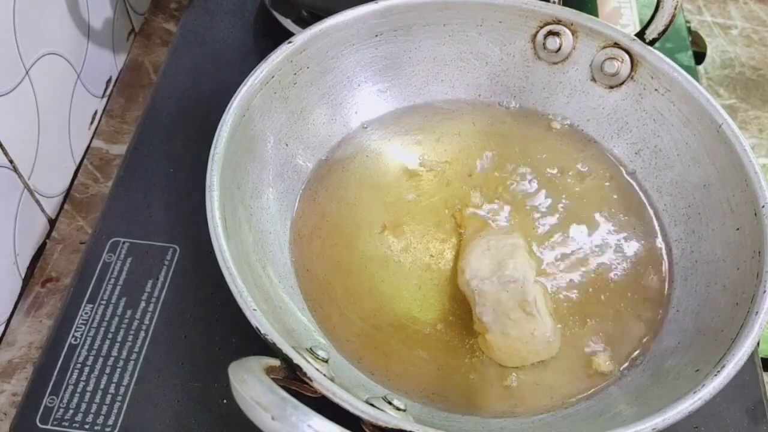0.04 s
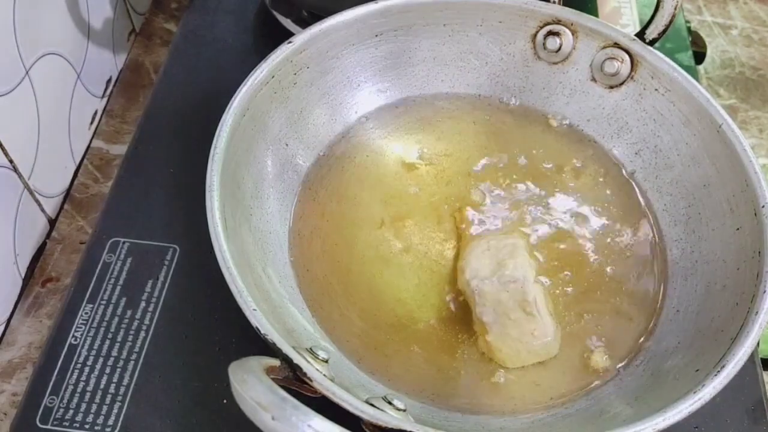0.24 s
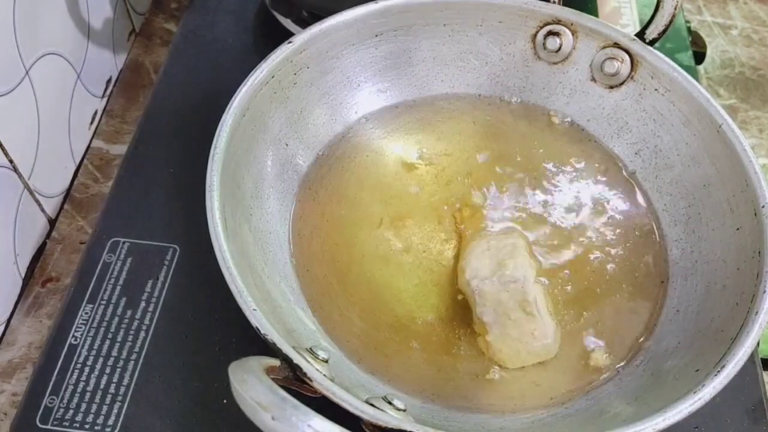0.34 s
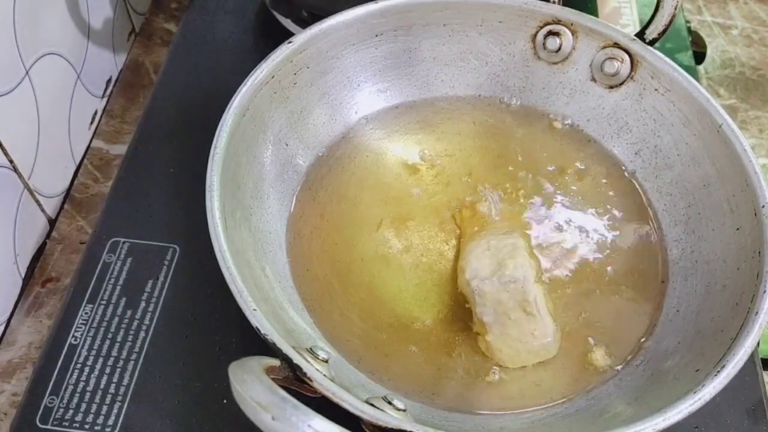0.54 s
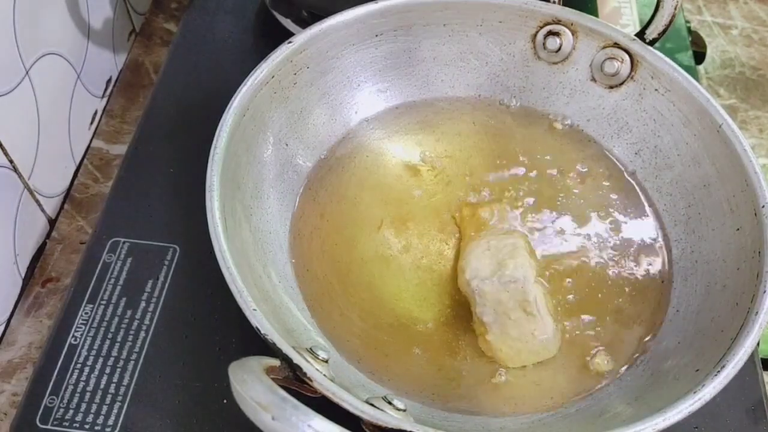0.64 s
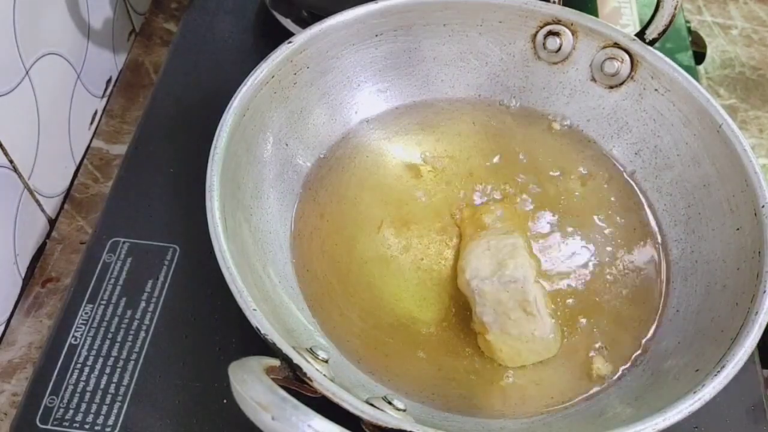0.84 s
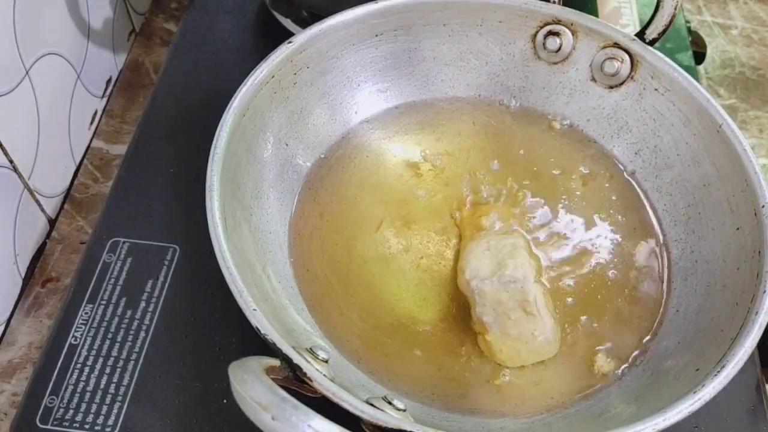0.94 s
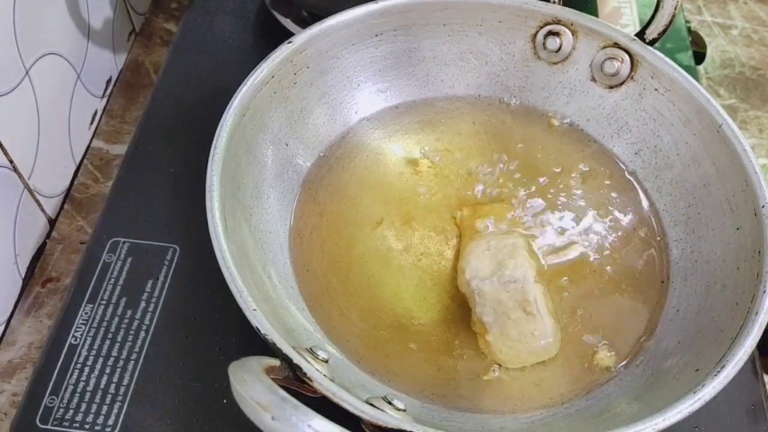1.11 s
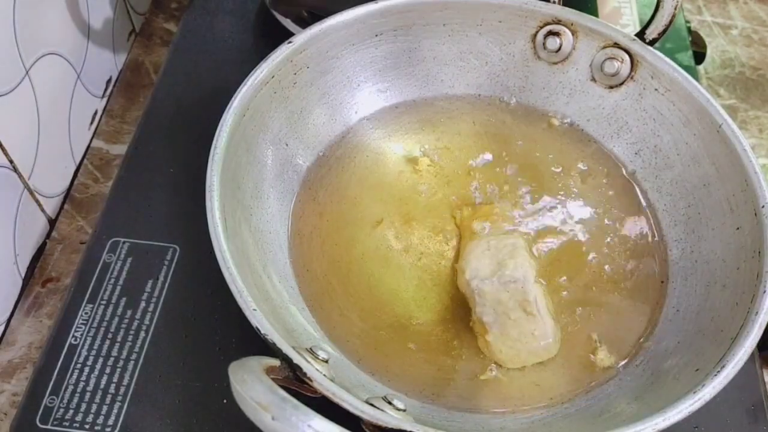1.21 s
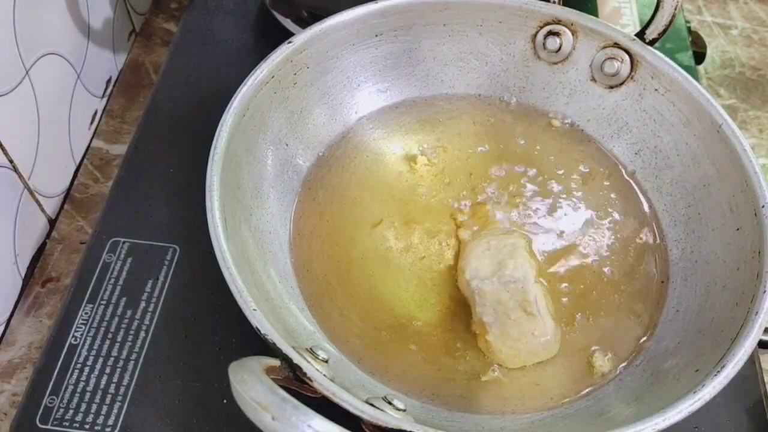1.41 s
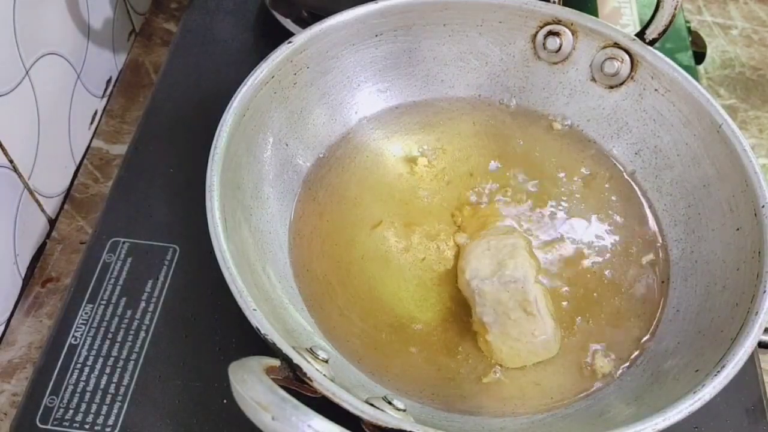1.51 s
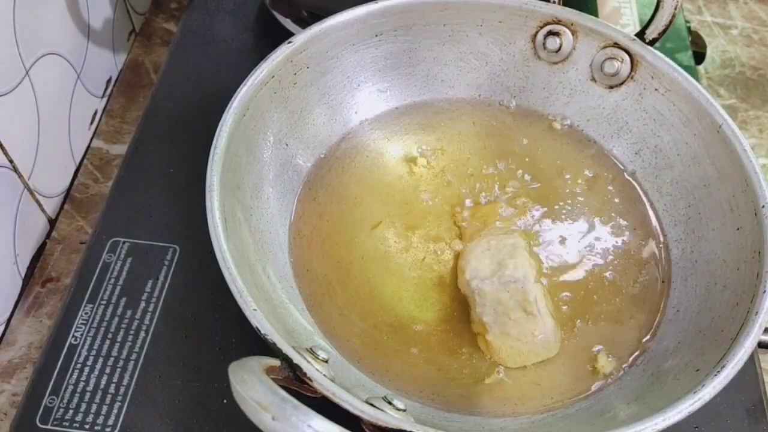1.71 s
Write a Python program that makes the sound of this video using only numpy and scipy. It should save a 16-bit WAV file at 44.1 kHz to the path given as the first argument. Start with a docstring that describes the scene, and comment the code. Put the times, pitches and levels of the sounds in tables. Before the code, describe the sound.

Oil sizzles and snaps around frying batter in a metal pan, with a knock on the counter

```python
"""In a small hard-walled kitchen, a piece of batter fries slowly in a deep metal pan.
Steam pockets pop one by one: clicks ring the pan, a bubble and the spray. Many tiny ringing grains make
the sizzle, and shaped noise makes the low hum. Short tone bursts knock on the counter and the room booms.
A fluttering pair of tones is a thin squealing jet of steam; swells of hollow noise are soft thuds."""
import sys
import numpy as np
from scipy import signal
from scipy.io import wavfile

SR = 44100
rng = np.random.default_rng(int(sys.argv[2]) if len(sys.argv) > 2 else 0)


def rack_gain(trim_db):
    """Turn a fader trim in dB into the linear factor to multiply a signal by."""
    fader = np.asarray(trim_db, float)
    return 10 ** (fader / 20)


def wav_record(signal):
    """Record a signal, one row per channel, as 16-bit PCM in the file named by sys.argv[1]."""
    frames = np.transpose(np.atleast_2d(signal))
    bounded = np.clip(frames, -1, 1)
    # unit amplitude maps onto the largest positive 16-bit level
    quanta = np.round(bounded * 32767).astype(np.int16)
    wavfile.write(sys.argv[1], SR, quanta)


N = 77175
LEAD = SR // 10  # samples made ahead of time 0, cut off in scene()
TIME = (np.arange(N + LEAD) - LEAD) / SR


def rms_one(x):
    """Scale a sound to an rms (average strength) of 1."""
    return x / np.sqrt(np.mean(x ** 2) + 1e-20)


def at_hz(points, hz):
    """Read a table between its points, on a log-frequency axis."""
    table_hz, values = np.transpose(points)
    return np.interp(np.log(hz), np.log(table_hz), values)


def drift(rate_hz, size):
    """Random wandering around 0 with rms 1: noise smoothed twice, so fast changes die out."""
    r = np.exp(-2 * np.pi * rate_hz / SR)
    noise = rng.standard_normal(size + SR)
    smooth = signal.lfilter([1], [1, -2 * r, r * r], noise)
    return rms_one(smooth[SR:])  # skip the first second, while the filter settles


def ring(clicks, hz, t60):
    """Each unit click starts a sine of height 1 that falls 60 dB in t60 seconds."""
    r, w = rack_gain(-60 / (t60 * SR)), 2 * np.pi * hz / SR
    return signal.lfilter([0, np.sin(w)], [1, -2 * r * np.cos(w), r * r], clicks + 1e-18)


def resonate(x, hz, width_hz):
    """Pass a sound twice through one resonance; white noise roughly keeps its rms."""
    r = np.exp(-np.pi * width_hz / SR)
    b = np.array([1, 0, -1]) * (1 - r * r) / 2
    a = [1, -2 * r * np.cos(2 * np.pi * hz / SR), r * r]
    once = signal.lfilter(b, a, x + 1e-18)
    return signal.lfilter(b, a, once) * np.sqrt(SR / (2 * width_hz))


def left_right(db):
    """Gains that make the left side db louder than the right."""
    return rack_gain(db / 2 * np.array([[1], [-1]]))


# How alike left and right are: (frequency [Hz], likeness [0 to 1])
LIKENESS = [(30, 0.91), (120, .98), (300, 0.54), (2000, 0.27), (12000, 0.033)]


def bands(size, shape):
    """Stereo noise in half-octave bands, each multiplied by shape(Hz); shared noise makes sides alike."""
    out, edges = 0, 22 * 2 ** np.arange(0, 9.6, .5)
    white = rng.standard_normal((2, 2, size))  # neighbouring bands take turns with two noises
    for k, (low, high) in enumerate(zip(edges, edges[1:])):
        band = signal.butter(2, [low, high], "band", fs=SR, output="sos")
        mid, side = signal.sosfilt(band, white[k % 2])
        hz = np.sqrt(low * high)
        alike = np.clip(at_hz(LIKENESS, hz), 0, 1)
        stereo = np.sqrt(1 + alike) * mid + np.sqrt(1 - alike) * side * [[1], [-1]]
        out = out + shape(hz) * stereo
    return out


# Resonances that colour the spray: (frequency [Hz], width of each pass [Hz], level [dB])
SPLASH = [(4200, 730, -6.5), (5420, 1400, -3), (7220, 1070, 3.5), (11880, 4800, -5.5)]


def splash(x):
    """Bursting spray: a few broad resonances side by side."""
    return sum(rack_gain(level_db) * resonate(x, hz, width) for hz, width, level_db in SPLASH)


PAN_HZ, PAN_WIDTH_HZ = 2590, 700
BUBBLE_Q = 3.2  # bubble pitch over resonance width
RATTLE_S, RATTLE_FEEDBACK = (.00025, .0006, .001), .45  # longest delays, shortened at random for each pop
POP_DB = 15  # added to all three levels in the table
# Steam pops: (time [s], pan ring level [dB], bubble level [dB], bubble pitch [Hz], splash level [dB])
POPS = [(-.03, -30, -23, 5100, -29.5), (0.1202, -38.5, -40, 3900, -53), (0.1289, -37.5, -39, 6600, -59),
        (0.2035, -37.5, -50, 4350, -66), (0.22, -42, -43, 6500, -65), (0.3019, -18.5, -30.5, 4700, -36),
        (0.3434, -59, -69, 7300, -41), (0.3944, -65, -28.5, 6720, -36.5), (0.6918, -99, -36.5, 6420, -43),
        (0.7801, -31, -27, 4500, -38.5), (.8255, -79, -51, 3760, -55), (0.9621, -52, -53.5, 7500, -46),
        (1.124, -41.5, -29, 4880, -39), (1.156, -45, -44, 4630, -54.5), (1.3136, -65, -33, 6720, -35.5),
        (1.5225, -60, -36, 9560, -41), (1.6753, -28.5, -27.5, 4020, -32.5)]


def pops():
    """A click drives the pan, a bubble and the spray; all-pass delays smear it as bounces inside the pan."""
    out = np.zeros((2, N + 2 * LEAD))
    click = np.zeros(SR // 20)
    click[0] = 1
    for s, pan_db, bubble_db, hz, splash_db in POPS:
        pan = rack_gain(pan_db) * resonate(click, PAN_HZ, PAN_WIDTH_HZ)
        bubble = rack_gain(bubble_db) * resonate(click, hz, hz / BUBBLE_Q)
        sound = pan + bubble + rack_gain(splash_db) * splash(click)
        shared, own = rng.uniform(.7, 0.99, 3), rng.uniform(0.95, 1.03, (2, 3))
        start = LEAD + int(s * SR)
        for side in range(2):
            heard = sound
            lags = (np.array(RATTLE_S) * shared * own[side] * SR).astype(int)
            for lag in lags:
                a = np.r_[1, np.zeros(lag - 1), -RATTLE_FEEDBACK]
                heard = signal.lfilter(a[::-1], a, heard)
            out[side, start:start + len(click)] += rack_gain(POP_DB) * heard
    return out[:, :N + LEAD] * left_right(.6)


GRAIN_SPREAD_DB = 3


def grains(curve, per_s, pitches, sharpness):
    """Random tiny bubbles ring briefly, separately on each side; their level follows a curve."""
    size, (s, level_db) = (2, N + LEAD), np.transpose(curve)
    strength = rack_gain(GRAIN_SPREAD_DB * np.minimum(rng.exponential(1, size), 4)) * rng.choice([-1, 1], size)
    born = rng.random(size) < per_s / SR
    pitch_index = rng.integers(0, len(pitches), size)
    rings = 0
    for k, hz in enumerate(pitches):
        rings = rings + resonate(strength * born * (pitch_index == k), hz, hz / sharpness)
    return rack_gain(np.interp(TIME, s, level_db)) * rms_one(rings)


SIZZLE_PER_S, SIZZLE_DB = 6500, -1.5  # grains a second on each side; dB added to the table
SEETHE_PER_S, SEETHE_DB = 1000, 5
# Fine sizzle: (time [s], level [dB])
HISS = [(0.0, -49), (0.272, -60.5), (0.424, -66.5), (0.676, -51), (0.842, -48), (0.974, -64),
        (1.622, -72.5), (1.75, -44)]
# Low seething of the oil: (time [s], level [dB])
SEETHE = [(0.0, -63), (0.228, -61.5), (0.374, -58.5), (0.516, -66), (0.716, -60), (0.804, -56.5),
          (0.96, -65.5), (1.188, -96.5), (1.374, -68.5), (1.51, -74), (1.75, -104)]


def sizzle():
    """Many high bubbles make the fine sizzle; fewer, lower ones make the seething of the oil."""
    fine = grains(HISS, SIZZLE_PER_S, np.geomspace(2200, 8200, num=12), sharpness=5.2)
    low = grains(SEETHE, SEETHE_PER_S, np.geomspace(620, 1900, num=10), sharpness=5.3)
    return rack_gain(SIZZLE_DB) * fine + rack_gain(SEETHE_DB) * low


FLOOR_DB = -59.5  # overall rms of hum and hiss
# Colour of hum and hiss, before scaling: (frequency [Hz], relative level per Hz [dB])
FLOOR = [(20, 7), (40, -21), (93, 1), (200, -20.5), (300, -19.5), (900, -23), (2560, -24.5), (7480, -31),
         (10000, -40), (15000, -25)]


def hum():
    """Hum and hiss of the kitchen: shaped noise whose bands each waver gently in level."""
    noise = bands(N + LEAD, lambda hz: rack_gain(at_hz(FLOOR, hz) + 2.0 * drift(1.33, N + LEAD)))
    return rack_gain(FLOOR_DB) * rms_one(noise)


TAIL_RISE_S, EARLY_T60_S = 0.001, 0.035
# Near surfaces: (delay [s], level [dB])
ECHOES = [(.0052, -12), (.0075, -12), (.0135, -14)]
# Dense early cluster, starting level: (frequency [Hz], level [dB])
EARLY = [(300, -28), (1000, -43.5), (2500, -19.5), (7000, -33)]
# Long tail, starting level: (frequency [Hz], level [dB])
TAIL = [(200, -38), (500, -28), (900, -44.5), (1500, -46), (2500, -33.5), (5000, -31.5), (8000, -33.5),
        (12000, -39)]
# Time the tail takes to fall 60 dB: (frequency [Hz], time [s])
ROOM_T60 = [(200, 0.3), (500, 0.53), (900, 0.57), (1500, 0.6), (2500, 0.52), (6000, 0.23), (12000, 0.72)]


def room(x):
    """Hard walls add near echoes, a dense early cluster and a diffuse tail that dies band by band."""
    t = np.arange(SR) / SR

    def fading(hz):
        tail = rack_gain(at_hz(TAIL, hz) - 60 * t / at_hz(ROOM_T60, hz))
        return tail + rack_gain(at_hz(EARLY, hz) - 60 * t / EARLY_T60_S)

    response = (1 - np.exp(-t / TAIL_RISE_S)) * bands(SR, fading)
    for lag, level_db in ECHOES:
        lags = (lag * rng.uniform(.94, 1.06, 2) * SR).astype(int)  # a little different on each side
        response[[0, 1], lags] += rack_gain(level_db)
    return x + signal.fftconvolve(x, response, axes=1)[:, :x.shape[1]]


KNOCK_CRACK_DB = -27  # crack relative to the tone burst
# Knocks on the counter: (time [s], level [dB], pitch [Hz], contact [s], push on the boom [dB])
KNOCKS = [(.2397, -6.5, 923, 0.00045, -27.5), (0.4176, -25, 697, 0.00069, -32.5)]


def knocks():
    """Each knock is a bell-shaped tone burst, longer for a longer contact, with a faint crack."""
    direct = np.zeros(N + LEAD)
    for s, level_db, hz, contact, _ in KNOCKS:
        u = TIME - s - contact
        burst = np.exp(-.5 * (u / contact) ** 2) * np.cos(2 * np.pi * hz * u + 1)
        direct += rack_gain(level_db) * burst
        direct[LEAD + int(s * SR)] += rack_gain(level_db + KNOCK_CRACK_DB)
    direct = signal.sosfilt(signal.butter(2, 150, "high", fs=SR, output="sos"), direct)
    return direct * left_right(2.5)


BOOM_RISE_HZ, BOOM_WAVER_HZ, BOOM_WAVER_DB = 27.8, 22, 2.5
COUNTER_T60_S, COUNTER_LAG_S = .42, 0.00085
THUD_BOOM_DB = -10  # push of a thud relative to its own level
# Room modes: (frequency [Hz], level [dB], time to fall 60 dB [s])
LOW_BOOM = [(72.8, -23, 0.92), (91.57, -7, 1.15), (113.1, -12.5, 1.28), (160.9, -5.5, 1.2), (221, -17, 1.8)]
# Counter modes: (frequency [Hz], level [dB])
COUNTER_DB = [(334, 1), (418, -10), (462, -10.5), (500, -4), (580, -23.5), (640, -8), (718, -8), (785, -8)]


def boom():
    """Knocks and thuds push the wavering modes of counter and room, which rise softly and ring on."""
    pushes = [(knock[0], knock[4]) for knock in KNOCKS]
    pushes += [(thud[0], thud[1] + THUD_BOOM_DB) for thud in THUDS]
    push = np.zeros(N + LEAD)
    for s, level_db in pushes:
        push[LEAD + int(s * SR)] = rack_gain(level_db)
    modes = LOW_BOOM + [(hz, level_db, COUNTER_T60_S) for hz, level_db in COUNTER_DB]
    out = 0
    for hz, level_db, t60 in modes:
        # taking away a quickly dying copy makes the start soft
        quick = ring(push, hz, np.log(1000) / (2 * np.pi * BOOM_RISE_HZ))
        rising = ring(push, hz, t60) - quick
        # above 300 Hz the right side is shifted in time
        lag = int(rng.uniform(-1.56, 1) * COUNTER_LAG_S * SR * (hz > 300))
        lean_db = rng.normal(0, 0.99) * np.log(hz / 80) * np.array([[1], [-1]])
        waver_db = BOOM_WAVER_DB * drift(BOOM_WAVER_HZ, len(push))
        out = out + rack_gain(level_db + lean_db + waver_db) * np.array([rising, np.roll(rising, lag)])
    return out


SQUEAL_HZ, SQUEAL_WANDER_HZ = 6930, 90  # middle pitch and rms wander
FLUTTER_HZ, FLUTTER_DB = 150, 6  # the rate serves both pitch and level
UPPER_RATIO, OCTAVE_DB = 1.965, -13.5  # upper whistle, near the octave
# Steam jet, before its flutter: (time [s], level [dB])
SQUEAL = [(0.8, -59), (0.812, -76), (0.82, -41), (0.832, -51), (0.856, -59), (0.878, -58), (0.882, -43.5),
          (0.932, -83), (0.95, -84), (0.962, -43.5), (0.978, -66.5), (1.014, -80), (1.06, -93)]


def squeal():
    """A thin jet of steam whistles two tones, wandering in pitch and fluttering in level."""
    s, level_db = np.transpose(SQUEAL)
    hz = SQUEAL_HZ + SQUEAL_WANDER_HZ * drift(FLUTTER_HZ, len(TIME))
    phase = 2 * np.pi * np.cumsum(hz) / SR
    flutter_db = FLUTTER_DB * drift(FLUTTER_HZ, len(TIME))
    level = rack_gain(np.interp(TIME, s, level_db, -120, -120) + flutter_db)
    whistle = np.sin(phase) + rack_gain(OCTAVE_DB) * np.sin(UPPER_RATIO * phase)
    return level * whistle * left_right(-3)


# Soft thuds: (time [s], level [dB], length [s])
THUDS = [(0.863, -50.5, 0.044), (1.401, -37, .035), (1.448, -46, 0.021)]
# Hollow body of the thuds: (frequency [Hz], width of each pass [Hz], level [dB])
THUD_BODY = [(350.4, 54, -12.5), (421.6, 132, -5.5), (618, 155, -8.5), (1035, 350, -16.5)]


def thuds():
    """Noise swells softly up and down and rings in a hollow body."""
    swell = np.zeros(len(TIME))
    for s, level_db, length in THUDS:
        swell += rack_gain(level_db) * np.sin(np.pi * np.clip((TIME - s) / length, 0, 1)) ** 2
    noise = swell * rng.standard_normal(len(TIME))
    body = sum(rack_gain(level_db) * resonate(noise, hz, width) for hz, width, level_db in THUD_BODY)
    return body * left_right(-3)


def scene():
    """Pops, squeal, knocks and thuds echo in the room; boom, sizzle and hum are added as they are."""
    echoing = room(pops() + squeal() + knocks() + thuds())
    return (echoing + boom() + sizzle() + hum())[:, LEAD:]


def roll_off(x):
    """The treble ends steeply here."""
    return signal.sosfilt(signal.butter(12, 15430, fs=SR, output="sos"), x)


def record(dry):
    """A steep filter cuts the very top, 60 dB down from 16200 Hz upward."""
    mix = signal.sosfilt(signal.cheby2(10, 60, 16200, fs=SR, output="sos"), dry)
    return roll_off(mix)


dry = scene()
out = record(dry)
wav_record(out)
```